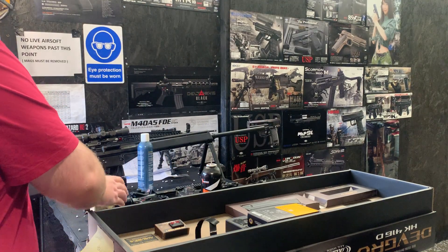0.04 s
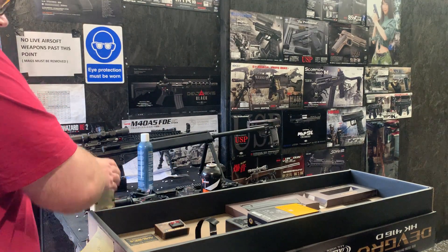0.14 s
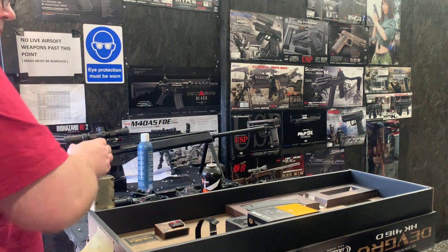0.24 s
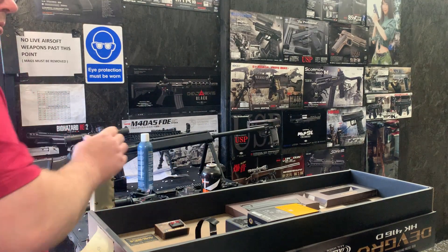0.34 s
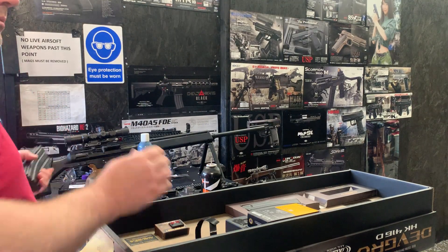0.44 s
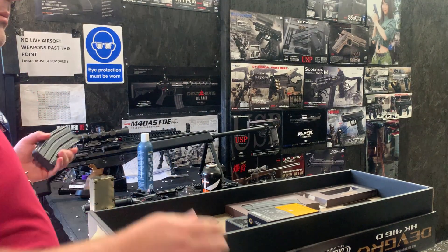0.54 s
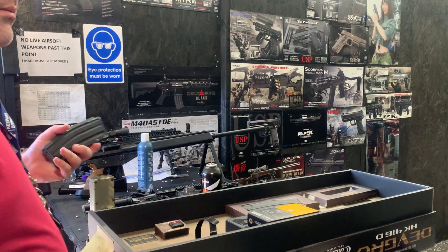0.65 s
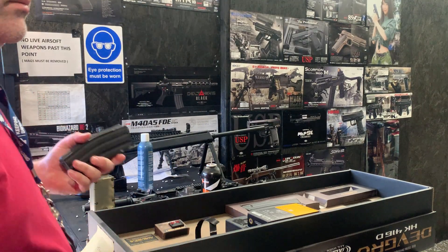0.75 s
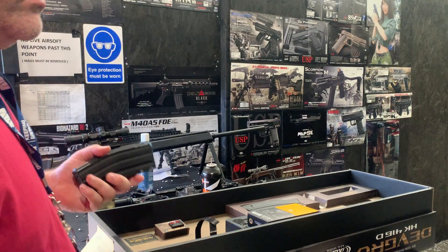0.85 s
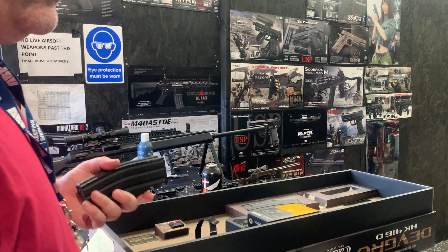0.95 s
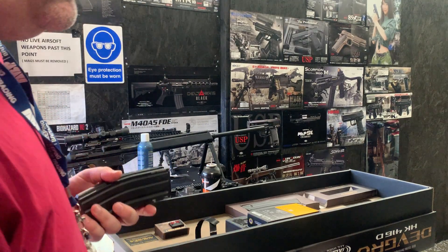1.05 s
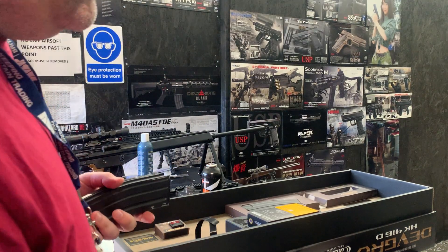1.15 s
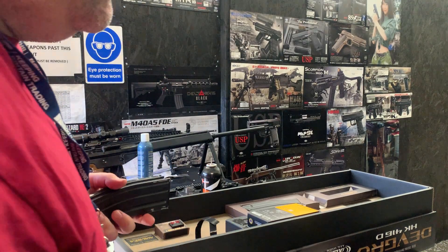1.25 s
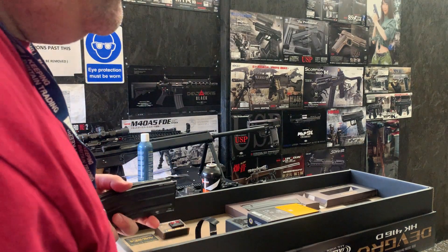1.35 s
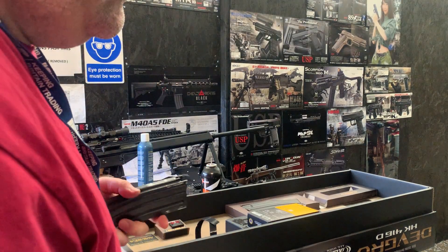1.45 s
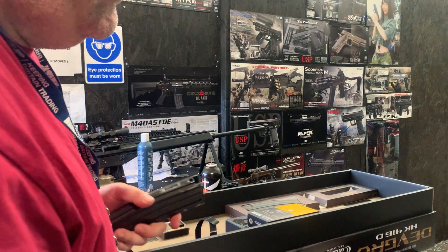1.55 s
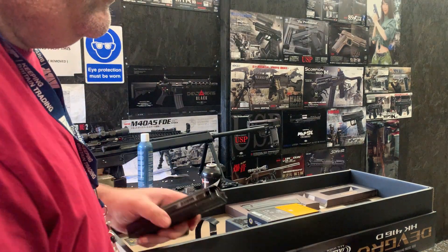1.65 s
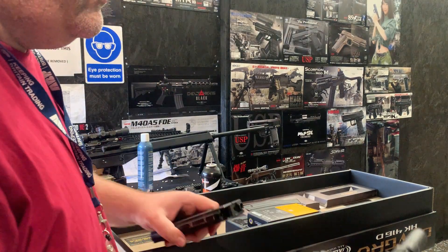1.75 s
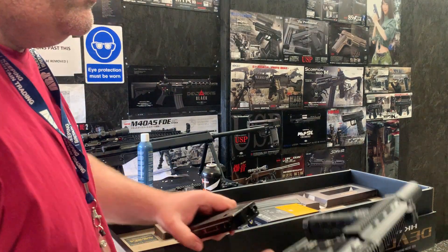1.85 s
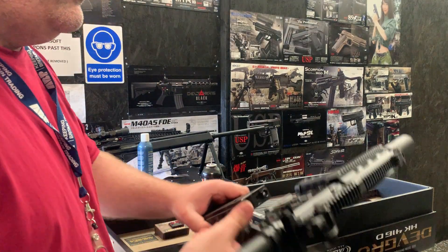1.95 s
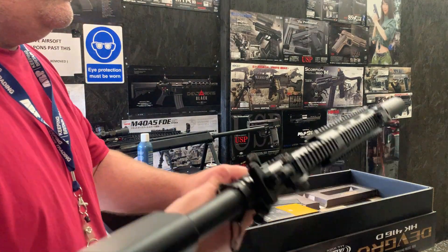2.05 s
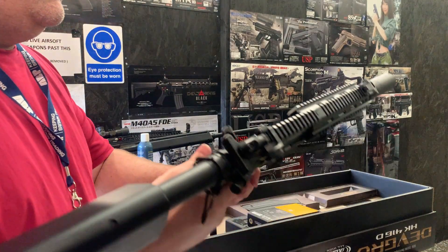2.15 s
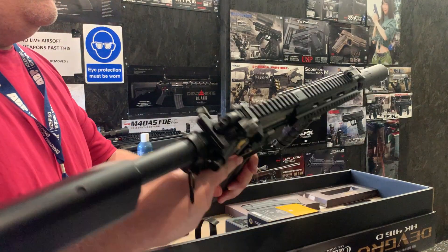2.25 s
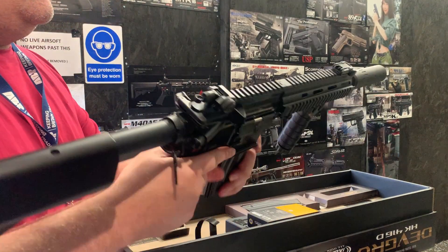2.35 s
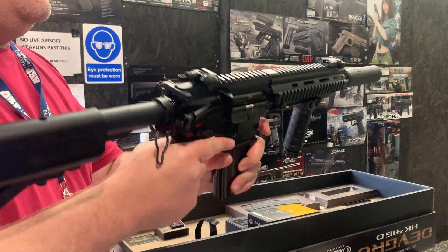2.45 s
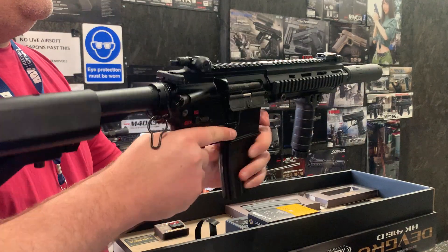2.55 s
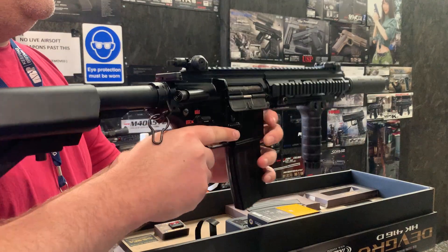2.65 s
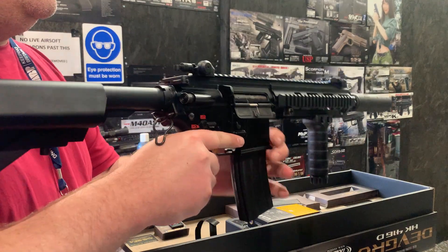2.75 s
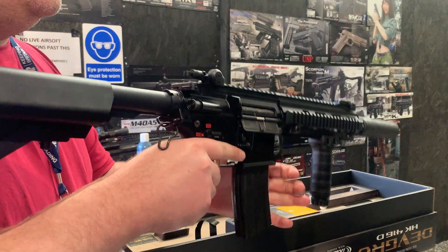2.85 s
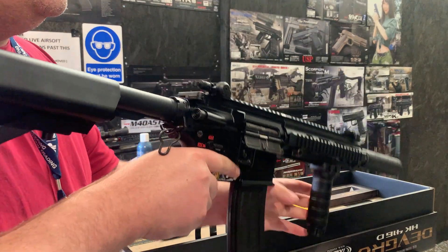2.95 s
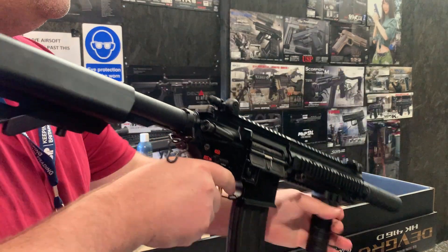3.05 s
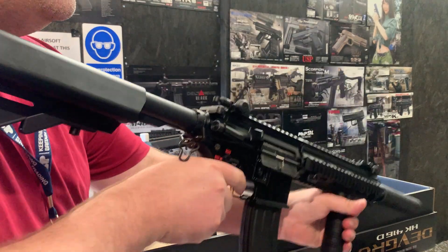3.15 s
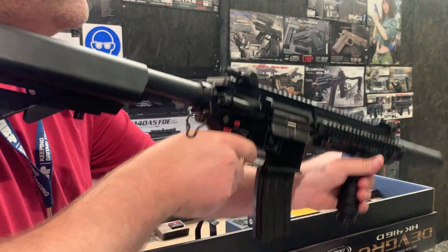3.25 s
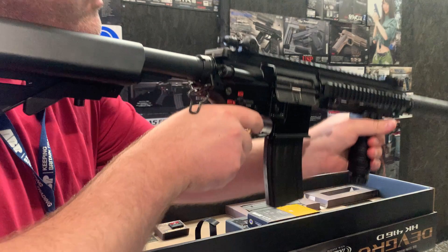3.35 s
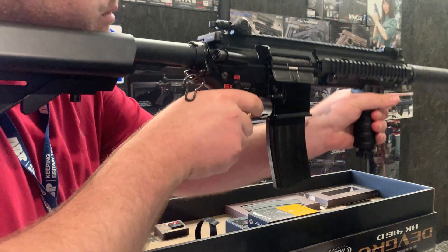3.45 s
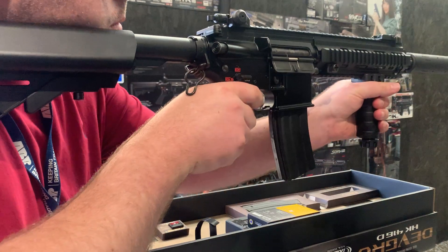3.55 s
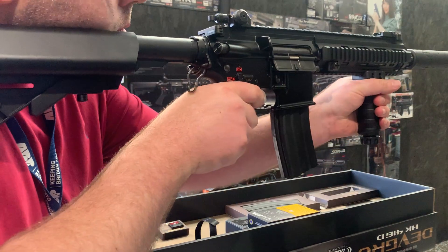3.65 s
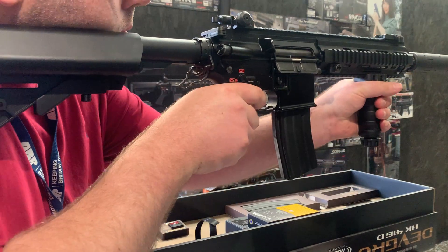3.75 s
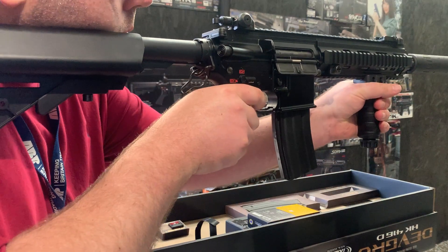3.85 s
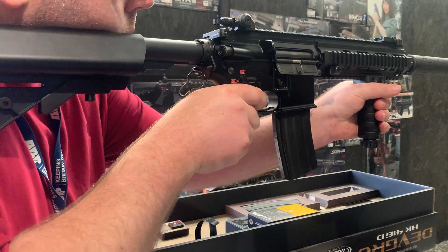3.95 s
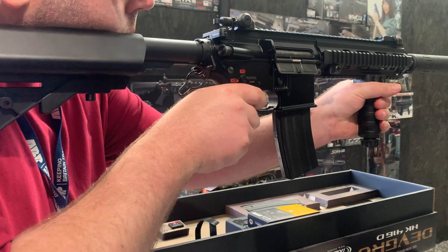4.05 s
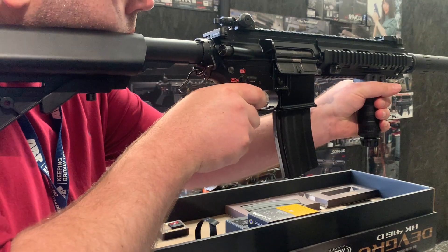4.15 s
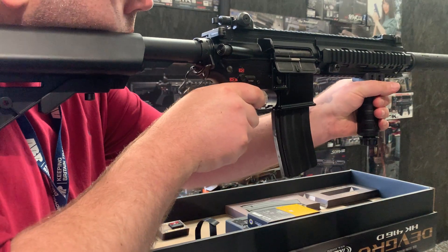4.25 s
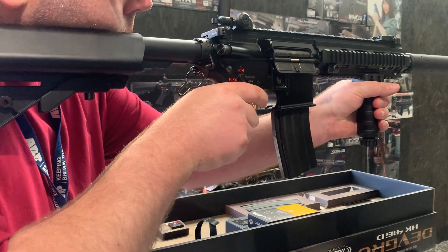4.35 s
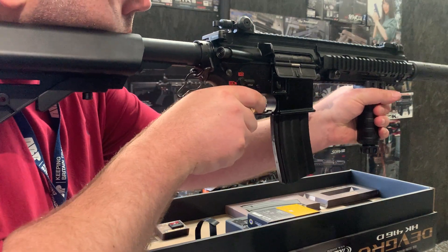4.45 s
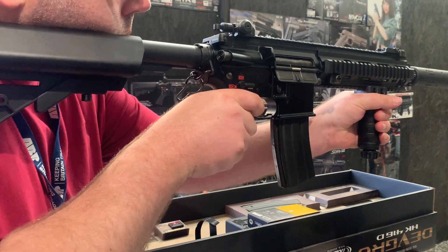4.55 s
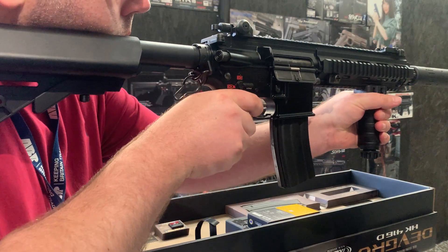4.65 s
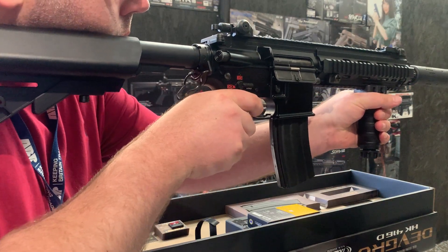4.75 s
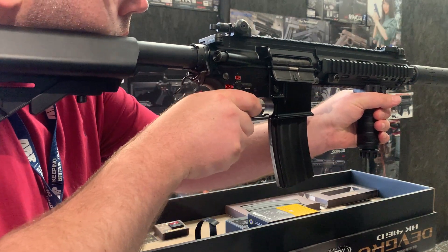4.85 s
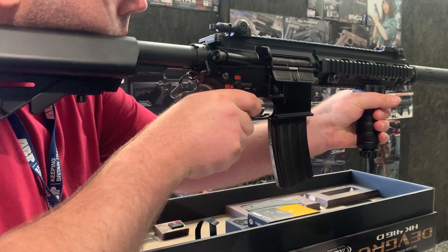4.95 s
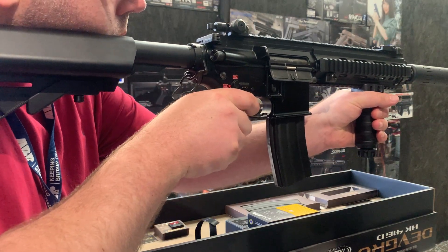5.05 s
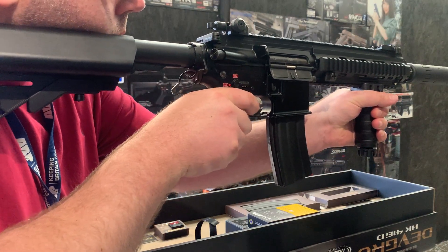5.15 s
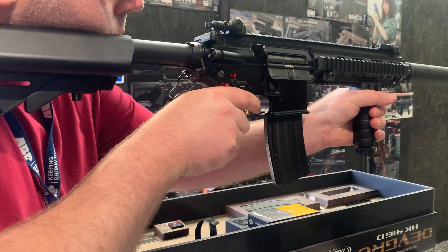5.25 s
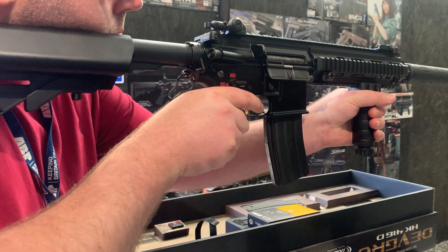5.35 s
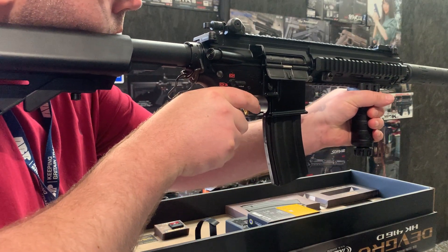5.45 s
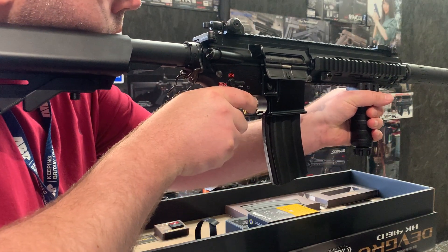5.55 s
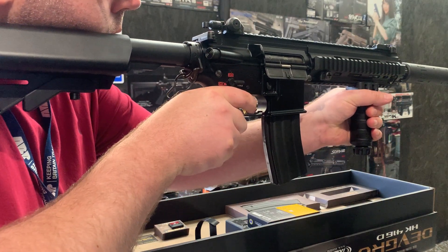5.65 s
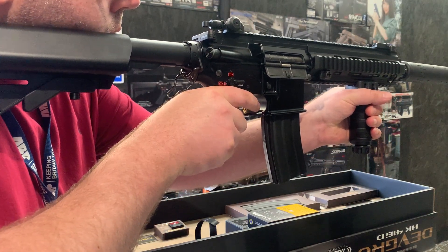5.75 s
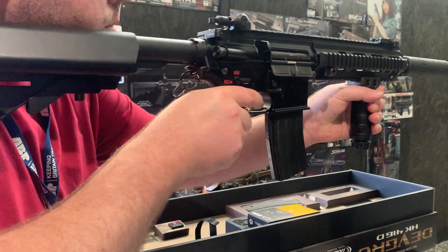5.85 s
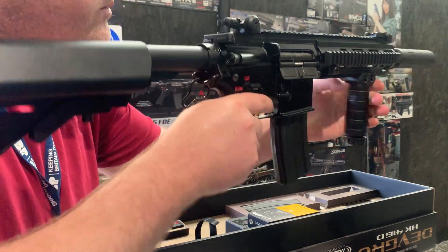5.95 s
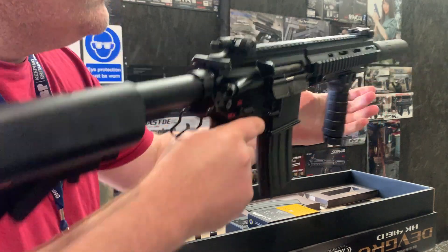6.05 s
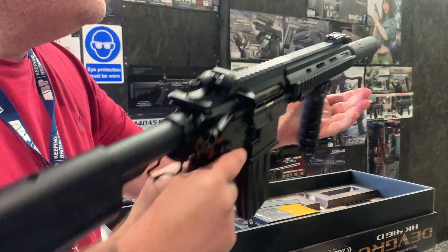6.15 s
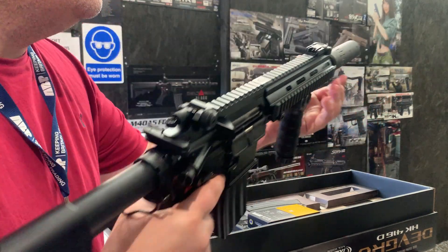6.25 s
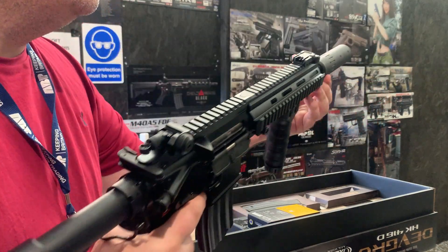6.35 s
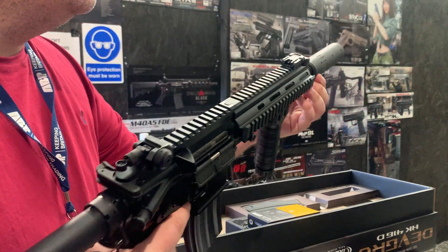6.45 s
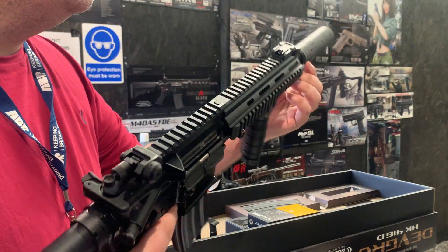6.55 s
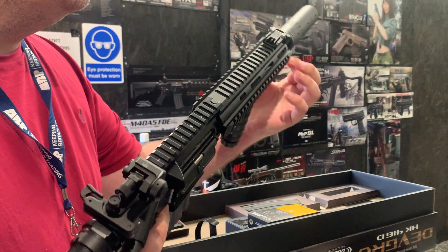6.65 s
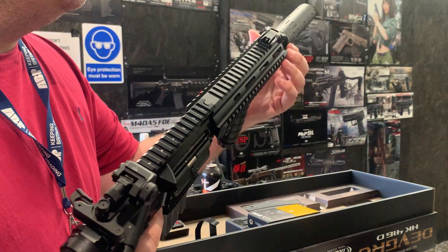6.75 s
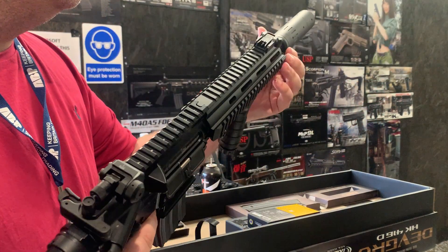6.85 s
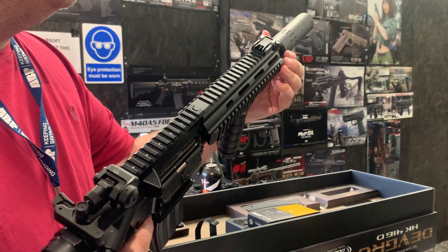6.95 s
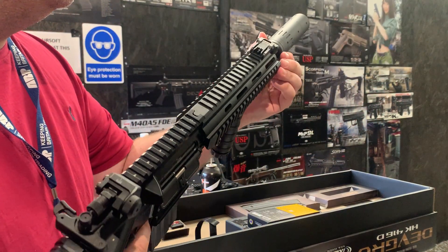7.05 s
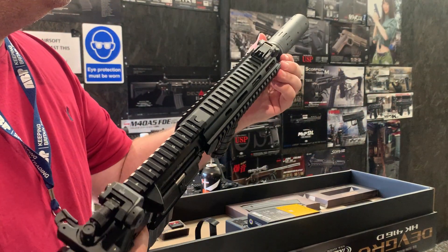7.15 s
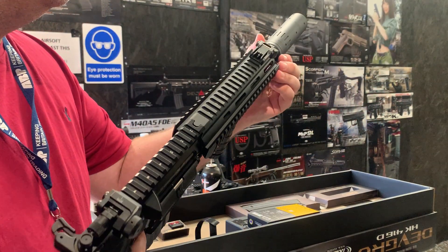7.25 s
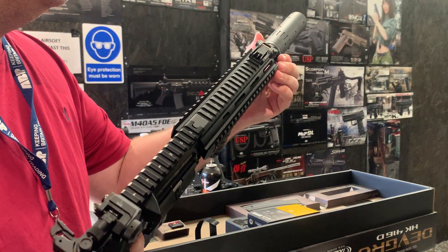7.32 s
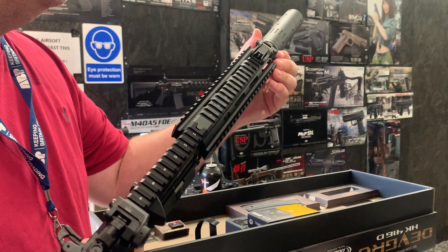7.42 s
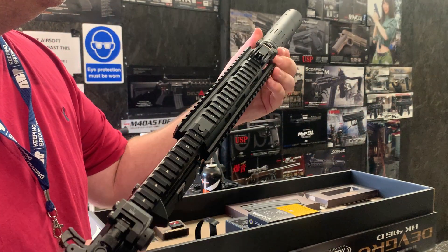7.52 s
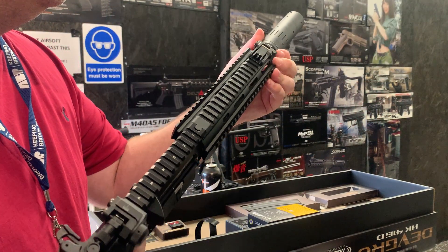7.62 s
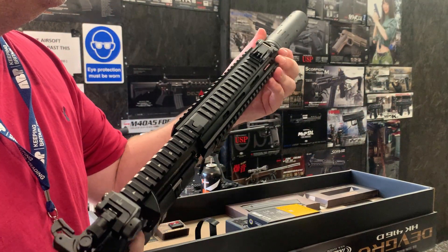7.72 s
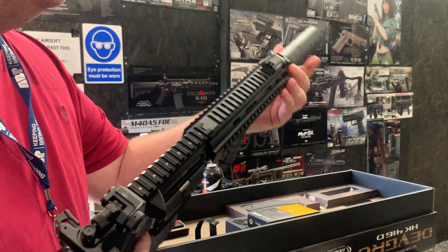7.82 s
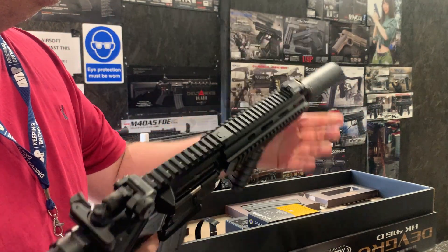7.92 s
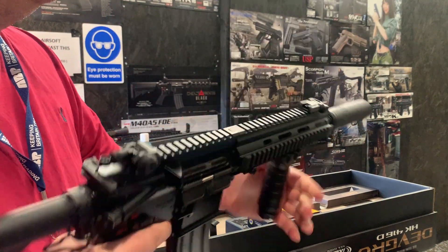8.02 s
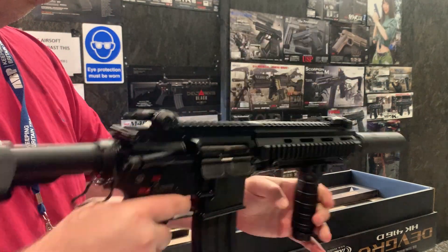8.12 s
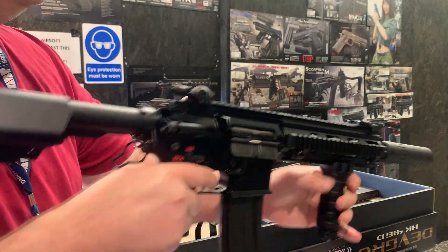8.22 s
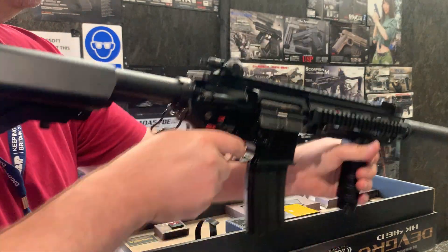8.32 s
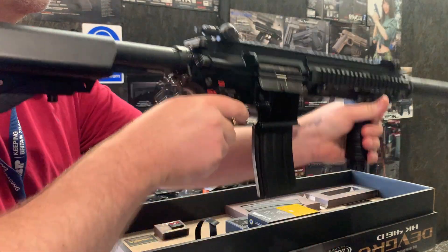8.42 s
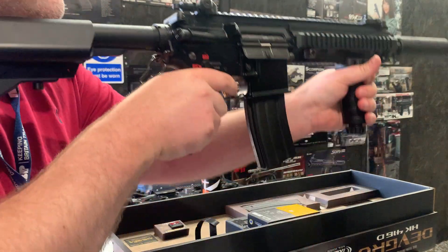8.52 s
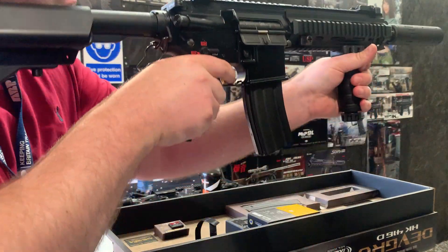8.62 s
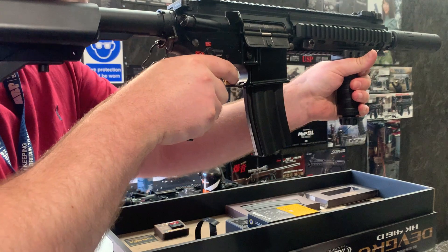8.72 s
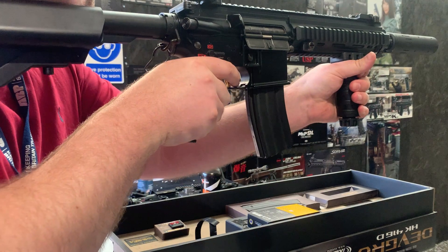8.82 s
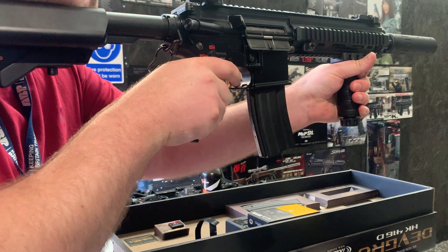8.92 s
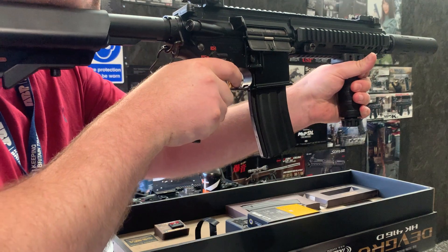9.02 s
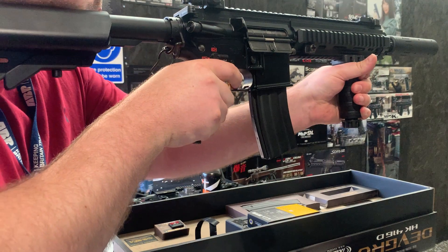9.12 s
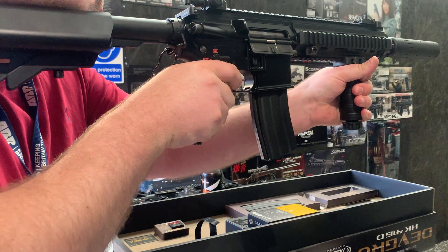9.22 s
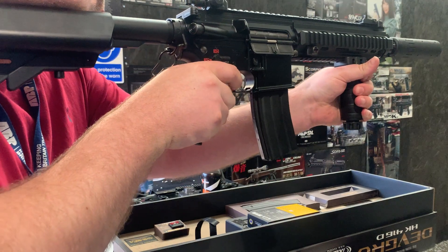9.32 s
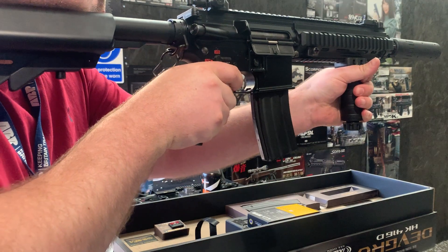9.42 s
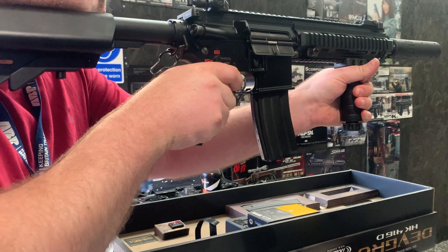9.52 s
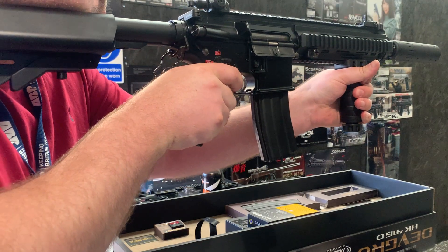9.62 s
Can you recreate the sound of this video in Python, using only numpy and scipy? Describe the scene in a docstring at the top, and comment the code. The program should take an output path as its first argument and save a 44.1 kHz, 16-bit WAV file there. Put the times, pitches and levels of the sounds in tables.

```python
"""Three full-auto bursts of an electric airsoft rifle are heard, close to a stereo microphone in a shop.
Each gearbox cycle is a row of impacts that excite the modes of the rifle body, over grinding gears.
Between bursts, clicks of magazine, sling and hands excite the modes of the fittings; one dull thud sounds early.
Behind them are reverberation, a low hum and a broad hiss that comes and goes, both shaped noise.
The recorder's gain control ducks for loud sound and barely recovers."""
import sys
import numpy as np
from scipy import signal
from scipy.fft import rfft, irfft, next_fast_len
from scipy.io import wavfile

SR = 44100
rng = np.random.default_rng(int(sys.argv[2]) if len(sys.argv) > 2 else 0)


def master(y):
    """Save y as 16-bit WAV."""
    cut = np.clip(np.atleast_2d(y).T, -1, 1)
    pcm = np.round(cut * 32767)  # scale
    wavfile.write(sys.argv[1], SR, pcm.astype(np.int16))


N = 426888   # length in samples

# All levels are relative, ahead of the recorder.
# Contacts of one gearbox cycle: [t from the slam/ms, level/dB, colour centre f/Hz, colour width/octaves,
# decay time/ms]
CYCLE = [(-17.5, 9, 13000, 0.64, 2), (-10, -7.5, 7200, 2.8, 7.2), (-4, -2.5, 9000, 1.3, 5.0),
         (-0.53, 14, 5840, 2.1, 1.19), (1.82, 8, 6500, 1.7, 1.8), (4.5, 1.5, 3200, 1.0, 2.8),
         (14, -3.5, 3900, .6, 2.5), (22.5, -5, 3100, 0.31, 2.2), (30, 1, 2570, 0.0982, 6.5),
         (34.5, -5.5, 2500, 0.089, 3.0), (37.5, -2.5, 4800, 0.17, 13)]
# Trigger held: [motor start t/s, gears take the load t/s, first piston slam t/s, cycle period/ms, motor stop t/s]
TRIGGER = [(3.582, 3.611, 3.679, 67.64, 4.441), (4.53, 4.547, 4.6175, 68.12, 5.322),
           (9.183, 9.209, 9.2805, 67.65, 9.75)]
# Modes of the rifle body, the widest being the crack of the shell: [f/Hz, width/Hz, level/dB]
RIFLE_MODES = [(410, 170, -14), (563, 100, -9.5), (1203, 63, -7.5), (2136, 130, -15), (2538, 86, -6.5),
               (3401, 406, -2.5), (3955, 122, 1), (4266, 150, -3.5), (5090, 180, -11), (5540, 310, -8.5),
               (6430, 700, -17), (7200, 418.5, -12.5), (9920, 1300, -14.5), (13030, 1500, -17),
               (875, 960, -12.5), (1530, 1780, -11), (6100, 6000, -17.5)]
# Handling knocks: [t/s, level/dB, colour centre f/Hz, colour width/octaves, decay time/ms]
HANDLING = [(0.109, -7, 1930, 0.51, 3.1), (0.209, -20, 2494, 1.3, 8.6), (0.334, -1.5, 3000, 0.41, 1.94),
            (0.537, -26.5, 1880, 0.45, 4.7), (0.727, -28, 4440, .6, 2.3), (1.61, -17, 3830, 0.71, 13),
            (2.097, -5.5, 2060, 1.65, 5.7), (2.119, -10.5, 2440, 1.73, 12), (2.195, -22, 1500, 1.5, 4.1),
            (2.211, -10, 1600, 1.03, 2.6), (2.22, -1, 2300, 1.24, 8.9), (2.248, -4, 1980, 0.9, 3.6),
            (2.301, -7, 2570, 1.25, 3), (2.344, -14.5, 1430, 0.83, 12), (2.365, 11.5, 2980, 1.17, 5.4),
            (2.395, 5, 1780, 2.1, 6), (2.407, 12.5, 4000, 1.4, 7.3), (2.74, -23.5, 6500, .5, 2.3),
            (2.776, -26, 3000, .8, 3.2), (2.81, -16, 3500, 1.3, 4), (2.873, -25, 3800, .8, 4.9),
            (3.061, -16.5, 4200, 1.3, 12), (3.12, -14.5, 7000, 0.95, 3.8), (3.154, -23, 5480, 0.98, 5.3),
            (5.429, -7, 1600, .4, 10), (5.505, -6.5, 1400, 0.93, 9.4), (6.06, -19, 2603, 0.66, 6.7),
            (6.375, -19, 3494, 0.93, 6.5), (6.432, -10, 8500, .5, 1.4), (6.59, -24, 2300, .5, 3.6),
            (6.63, -22.5, 4190, 1.16, 4.7), (7.284, -24.5, 1906, 0.29, 3.9), (8.132, -8, 3560, 1.55, 5.4),
            (8.168, -13, 2200, 1.3, 6.7), (8.185, -14, 1900, 1.17, 7.3), (8.235, -20, 3130, 1.2, 2.8),
            (8.346, -15.5, 2810, 1.2, 4.5), (8.385, -11, 2600, 1.27, 4.8), (8.49, -9.5, 4200, 0.46, 3.2),
            (8.577, -21.5, 4475, 0.94, 7)]
# Spells of faint loose rattling: [start t/s, end t/s, greatest level/dB, middle colour f/Hz]
RATTLES = [(0.117, 0.3, -29.5, 2210), (0.619, 0.862, -32.5, 2500), (2.098, 2.396, -22.5, 2000),
           (2.599, 2.743, -49, 2970), (3.032, 3.175, -24.5, 5000), (5.359, 5.602, -11.5, 1498),
           (5.748, 6.65, -28.5, 3500), (6.701, 7.401, -32, 3490), (8.061, 8.248, -19, 3210),
           (8.282, 8.36, -34, 3530)]
# Modes of magazine and fittings: [f/Hz, width/Hz, level/dB]
FITTING_MODES = [(322.6, 58, 10.5), (450, 55, 14), (1033, 70, 6), (1485.7, 150, -2.5), (1775, 130, -1),
                 (2110, 110, 0), (2690, 81, -7), (3150, 30, -2), (4150, 90, -2), (4640, 790, -9.5),
                 (5880, 280, -9), (7230, 84, -8), (10000, 1200, -7), (13600, 1500, -12), (2300, 2600, -8),
                 (7000, 2100, -9)]
# Modes of the building in the thud: [f/Hz, starting level/dB, t60/s]
THUD_MODES = [(48, -24, 0.4), (108.5, -27, 0.26), (183, -43, 0.51)]
# Nominal delays of the near echoes: [t/ms]
NEAR_ECHO_MS = [.7, 1.3, 2.3]
# Reverberation of the shop: [f/Hz, t60/s, level/dB]
SHOP = [(60, 1.1, 0), (200, 1.3, 4), (703.6, 1.09, 5), (1790, 0.91, 2), (4000, 0.67, -2), (7990, 0.64, 1.5),
        (13090, 0.49, -1.5)]
# Hiss over time: [t/s, level/dB]
HISS = [(0, -56), (0.4, -58.5), (0.6, -65.5), (0.8, -59), (0.88, -46.5), (1.15, -52.5), (1.55, -44.5),
        (1.75, -48.5), (2.05, -53.5), (2.65, -46.5), (2.87, -60), (3.0, -61.5), (3.15, -55.5), (3.3, -59.5),
        (5.75, -45), (6.0, -45.5), (6.45, -50), (6.65, -55), (7.35, -57.5), (7.5, -64), (8.0, -62.5),
        (8.28, -54.5), (8.45, -60.5), (8.62, -62), (8.69, -45.5), (9.159, -42.5)]
# Spectral density of the hiss: [f/Hz, level/dB per Hz]
HISS_COLOUR = [(470, -34), (800, -10), (830, -11), (1030, -4), (1560, 0.5), (2760, 2), (5340, -3),
               (10400, -8.5), (11900, -20.5), (13700, -15.5), (15500, -45.5)]
# Spectral density of the room hum: [f/Hz, level/dB per Hz]
HUM_COLOUR = [(15, -42), (25, -20), (53, -1), (92, -8), (125, -1.5), (310, -21), (362, -8), (388, -17.5),
              (510, -8.5), (743, -23), (796, -26.5), (838, -22.5), (1500, -26.5), (1950, -62), (3300, -120)]
# Correlation of left and right noise: [f/Hz, correlation from -1 to 1]
LIKENESS = [(60, 0.86), (180, 0.84), (550, 0.63), (1650, -0.097), (4970, 0.27), (15000, -0.26)]
# Nulls of the microphone ports: [f/Hz, width/Hz]
PORT_NOTCHES = [(11800, 880), (15000, 320)]

RIFLE_DB, CYCLE_JITTER_MS = 17.5, .6
GEAR_DB, IDLE_DB, TEETH_PER_S = -18.5, -10, 3500
TAKE_UP_DB = 0.1   # practically no excess as the gears take the load
PUFF_DB, PUFF_HZ, PUFF_MS, PUFF_LEAD_MS = -10, 120, 2.5, 3.2   # air driven out of the cylinder
RATTLES_PER_S, RATTLE_OCTAVES, RATTLE_MS = 80, .8, 7.6
THUD_S = 1.14
NEAR_ECHO_DB, NEAR_ECHO_HZ, LEFT_DB = -2, 444, -2
SHOP_DB, HUM_DB = -14.5, -50
# Treble of the hiss above SHEEN_HZ: level, slope in dB per dB, hiss level at which the slope adds nothing
SHEEN_HZ, SHEEN_DB, SHEEN_FOLLOWS, SHEEN_FROM_DB = 6010, -2, 0.24, -49.5
THRESHOLD_DB, DUCK_SHARE, RELEASE_DB_S, LISTEN_S = -20.5, 0.94, 0.27, 0.042
QUICK_S, SLOW_S, QUICK_SHARE = 0.008, 0.4, 0.95
OUTPUT_DB, CUTOFF_HZ = 1.99, 16250
KNOCK_SAMPLES = 800   # longest contact force


def from_db(db):
    """Amplitude ratio is ten to the power of dB over twenty."""
    return 10 ** (np.asarray(db) / 20)


def rms_one(x):
    """Normalisation by the root mean square."""
    return x / np.sqrt(np.mean(x ** 2) + 1e-20)


def at_hz(points, hz, axis=1):
    """Linear interpolation of a table column along a logarithmic frequency axis."""
    points = np.array(points)
    return np.interp(np.log(hz), np.log(points[:, 0]), points[:, axis])


def smooth(x, seconds, rate=SR):
    """First-order relaxation: a one-pole low-pass of the given time constant."""
    r = np.exp(-1 / (seconds * rate))
    return signal.lfilter([1 - r], [1, -r], x)


def drift(per_s):
    """Slow random fluctuation: white noise relaxed twice at a fortieth of the sample rate, rms 1."""
    slow = rng.standard_normal(N // 40 + 2002)
    for _ in range(2):
        slow = smooth(slow, .16 / per_s, SR / 40)
    settled = rms_one(slow[2000:])
    return np.interp(np.arange(N) / 40, np.arange(len(settled)), settled)


def resonate(x, hz, width_hz):
    """Damped oscillator: a two-pole resonance whose peak gain is 1."""
    r = np.exp(-np.pi * width_hz / SR)
    zeros = np.array([1, 0, -1]) * (1 - r * r) / 2
    poles = [1, -2 * r * np.cos(2 * np.pi * hz / SR), r * r]
    return signal.lfilter(zeros, poles, x + 1e-18)


def knocks(s, db, centre_hz, octaves, ms, modes, spread_db, rise, snap, rub=(0, 0)):
    """Modal excitation: each impact is a swelling, dying spray of clicks, strongest in modes near its colour."""
    age = np.arange(KNOCK_SAMPLES) / SR * 1000 / ms[:, None]   # in decay times
    shape = np.exp(-age) * (1 - np.exp(-age / rise))
    strength = np.linalg.norm(shape, axis=1)
    spray = shape * rng.standard_normal(age.shape) * (rng.random(age.shape) < .6)
    spray[:, 4] += snap / ms * strength   # one clean click leads, most in short knocks

    # Soft contacts lack treble
    edge_hz = centre_hz * 2 ** (2.5 * octaves)
    hz_axis = np.fft.rfftfreq(KNOCK_SAMPLES, 1 / SR)
    spray = irfft(rfft(spray) / (1 + 1j * hz_axis / edge_hz[:, None]) ** 2)
    spray *= (from_db(db) * 0.57 * strength / np.linalg.norm(spray, axis=1))[:, None]

    at = ((s * SR).astype(int)[:, None] + np.arange(KNOCK_SAMPLES)).ravel()
    luck_db = rng.normal(0, spread_db, (len(s), len(modes)))   # every knock strikes the modes anew
    out = 0
    for k, (hz, width_hz, mode_db) in enumerate(modes):
        nearness = np.exp(-.5 * (np.log2(hz / centre_hz) / octaves) ** 2)
        share = nearness * from_db(luck_db[:, k])
        impacts = np.bincount(at, (spray * share[:, None]).ravel(), N + KNOCK_SAMPLES)[:N]
        force = impacts + rub[k % 2]
        out = out + (-1) ** k * from_db(mode_db) * resonate(force, hz, width_hz)
    return out


def shots():
    """Periodic release: one piston slam a cycle, slightly irregular, from the first until the motor stops."""
    bursts = [np.arange(slam, min(stop, N / SR), ms / 1000) for _, _, slam, ms, stop in TRIGGER]
    slams = np.concatenate(bursts)
    return slams + rng.normal(0, CYCLE_JITTER_MS / 1000, len(slams))


def rifle(slams):
    """Repeated impact: each cycle's contacts, and one gear take-up a burst, excite the modes of the body."""
    rows = np.tile(CYCLE, (len(slams), 1))
    lag_ms = rows[:, 0] + rng.normal(0, .08, len(rows))
    rows[:, 0] = np.repeat(slams, len(CYCLE)) + lag_ms / 1000
    rows[:, 1] += rng.normal(0, 0.33, len(rows))
    when = rows[:, 0]
    running = np.any([(when > start) & (when < stop) for start, *_, stop in TRIGGER], axis=0)
    take_up = [(bite, -3, 2500, 2.2, 3.0) for _, bite, *_ in TRIGGER]   # columns as in CYCLE, but t/s
    contacts = np.vstack([rows[running], take_up]).T
    struck = knocks(*contacts, RIFLE_MODES, spread_db=3.0, rise=0.17, snap=1.7, rub=gears())
    return from_db(RIFLE_DB) * struck


def gears():
    """Tooth contact noise grows with load: light before the spring is engaged, then full until the motor stops."""
    t, load = np.arange(N) / SR, np.zeros(N)
    for start, bite, *_, stop in TRIGGER:
        loaded = 1 + (from_db(TAKE_UP_DB) - 1) * np.exp(-np.abs(t - bite) / 0.021)
        running = (t > start) * (t < stop)
        load += np.where(t < bite, from_db(IDLE_DB), loaded) * running
    white = rng.standard_normal((2, N))   # two meshes, feeding alternate modes
    teeth = ((rng.random(N) < TEETH_PER_S / SR) + 0.19) * white   # sparse contacts over a steady rub
    level = from_db(GEAR_DB + 2.0 * drift(60.0))
    return level * smooth(load, 0.0045) * rms_one(teeth)


def puffs(slams):
    """Volume displacement: each piston stroke drives out air as one low pressure swing."""
    t = np.arange(-900, 900) / SR
    swing = -np.sin(2 * np.pi * PUFF_HZ * t) * np.exp(-(t * 1000 / PUFF_MS) ** 2 / 2)
    strokes = np.zeros(N)
    strokes[((slams - PUFF_LEAD_MS / 1000) * SR).astype(int)] = from_db(PUFF_DB)
    pushed = signal.fftconvolve(strokes, swing, "same")
    # A small muzzle sheds little deep bass
    return signal.sosfilt(signal.butter(2, 65, "high", fs=SR, output="sos"), pushed)


def handling():
    """Impact excitation: contacts of magazine, sling and grips ring the modes of the fittings."""
    contacts = np.transpose(HANDLING + rattles())
    return knocks(*contacts, FITTING_MODES, spread_db=2.5, rise=0.55, snap=0.6)


def rattles():
    """Random impact sequence: small knocks scattered through each spell, as rows like those of HANDLING."""
    rows = []
    for start, end, db, centre_hz in RATTLES:
        count = int((end - start) * RATTLES_PER_S) + 1
        for when, size, hue in rng.random((count, 3)):
            s = start + when * (end - start)
            colour_hz = centre_hz * 2 ** (hue - .5)
            rows.append((s, db - 12 * size, colour_hz, RATTLE_OCTAVES, RATTLE_MS))
    return rows


def thud():
    """Free decay: low modes of the building, set ringing once, die exponentially."""
    t = np.clip(np.arange(N) / SR - THUD_S, 0, None)
    ringing = sum(from_db(db - 60 * t / t60) * np.sin(2 * np.pi * hz * t) for hz, db, t60 in THUD_MODES)
    return ringing * (1 - np.exp(-t / 0.0036))


def near_field(x):
    """Early reflection: echoes off counter, box and body reach the ports unlike; long waves pass them by."""
    click = np.arange(900) == 0
    echoes = signal.lfilter(*signal.butter(2, NEAR_ECHO_HZ, "high", fs=SR), click)
    delays_ms = np.array(NEAR_ECHO_MS) * rng.uniform(.9, 1.1, 3)
    for lag in (delays_ms * SR / 1000).astype(int):
        loop = np.r_[1, np.zeros(lag - 1), .55]
        echoes = signal.lfilter(loop[::-1], loop, echoes)   # all-pass echo
    side = from_db(NEAR_ECHO_DB) * signal.oaconvolve(x, echoes)[:N]
    return (x + side * [[1], [-1]]) * from_db([[LEFT_DB], [0]])


def shop(x):
    """Reverberation: convolution with noise that decays octave by octave, different in each channel."""
    t = np.arange(SR) / SR
    white, tail = rng.standard_normal((2, 2, SR)), 0
    for k, low_hz in enumerate(35 * 2 ** np.arange(9)):
        octave = signal.butter(2, [low_hz, 2 * low_hz], "band", fs=SR, output="sos")
        band = signal.sosfilt(octave, white[k % 2])
        middle_hz = low_hz * np.sqrt(2)
        t60, db = at_hz(SHOP, middle_hz), at_hz(SHOP, middle_hz, axis=2)
        tail = tail + band * from_db(-60 * t / t60 + db)
    tail *= 1 - np.exp(-t / 0.0022)
    tail_strength = np.sqrt(np.sum(tail[0] ** 2))
    return signal.fftconvolve(x[None], tail / tail_strength, axes=1)[:, :N]


def coloured_noise(spectrum, flicker_db):
    """Partial coherence: shaped stereo noise, alike in the bass, wavering a little in level, rms 1."""
    size = next_fast_len(N)
    hz = np.arange(1, size // 2 + 2) * SR / size
    mid, side = rfft(rng.standard_normal((2, size))) * from_db(at_hz(spectrum, hz))
    alike = np.clip(at_hz(LIKENESS, hz), -1, 1)
    pair = irfft(np.sqrt(1 + alike) * mid + np.sqrt(1 - alike) * side * [[1], [-1]])[:, :N]
    return rms_one(pair * from_db(flicker_db * drift(4.9)))


def hiss():
    """Broadband noise whose spectrum tilts with level: it grows duller as it grows fainter."""
    level_db = np.interp(np.arange(N) / SR, *np.transpose(HISS))
    noise = coloured_noise(HISS_COLOUR, flicker_db=2.1)
    dull = signal.sosfilt(signal.butter(2, SHEEN_HZ, fs=SR, output="sos"), noise)
    sheen_db = SHEEN_DB + SHEEN_FOLLOWS * (level_db - SHEEN_FROM_DB)
    return from_db(level_db) * (dull + from_db(sheen_db) * (noise - dull))


def hum():
    """Stationary noise concentrated at low frequency: the hum of the room."""
    return from_db(HUM_DB) * coloured_noise(HUM_COLOUR, flicker_db=1.5)


def scene():
    """Superposition: direct sound, near echoes and reverberation add to hum and hiss."""
    slams = shots()
    struck = rifle(slams) + handling()
    low = puffs(slams) + thud()
    wet = from_db(SHOP_DB) * shop(struck + low)
    return near_field(struck) + low + wet + hum() + hiss()


def gain_control(x):
    """Compression: loudness above the threshold is held, released very slowly, and turned down."""
    level_db = 10 * np.log10(smooth(np.mean(x ** 2, axis=0), LISTEN_S) + 1e-12)
    fall_db = RELEASE_DB_S * np.arange(N) / SR
    held_db = np.maximum.accumulate(level_db + fall_db) - fall_db
    duck_db = DUCK_SHARE * np.clip(held_db - THRESHOLD_DB, 0, None)
    quick_db = QUICK_SHARE * smooth(duck_db, QUICK_S)
    slow_db = (1 - QUICK_SHARE) * smooth(duck_db, SLOW_S)
    return x * from_db(-quick_db - slow_db)


def record(dry):
    """Transducer response: port nulls, gain control, saturating peaks and a steep top cut."""
    for hz, width_hz in PORT_NOTCHES:
        dry = signal.lfilter(*signal.iirnotch(hz, hz / width_hz, fs=SR), dry)
    evened = from_db(OUTPUT_DB) * gain_control(dry)
    rounded = .9 * np.tanh(evened / .9)
    return signal.sosfilt(signal.cheby2(12, 70, CUTOFF_HZ, fs=SR, output="sos"), rounded)


dry = scene()
out = record(dry)
master(out)
```